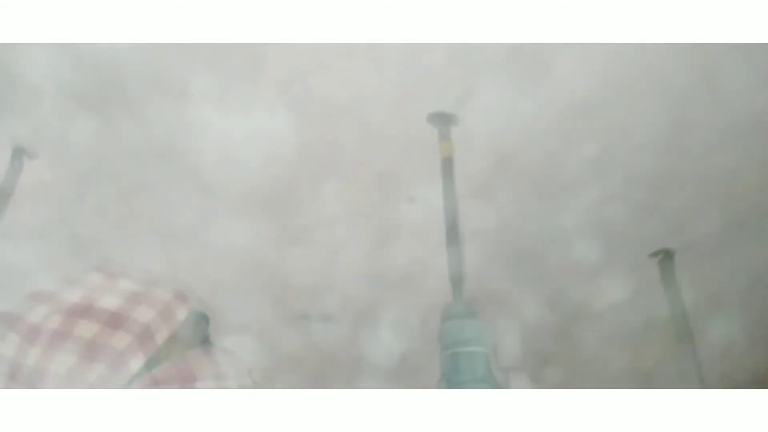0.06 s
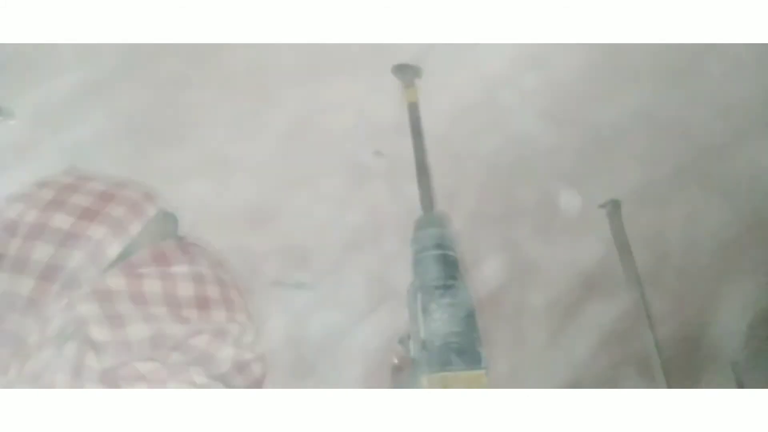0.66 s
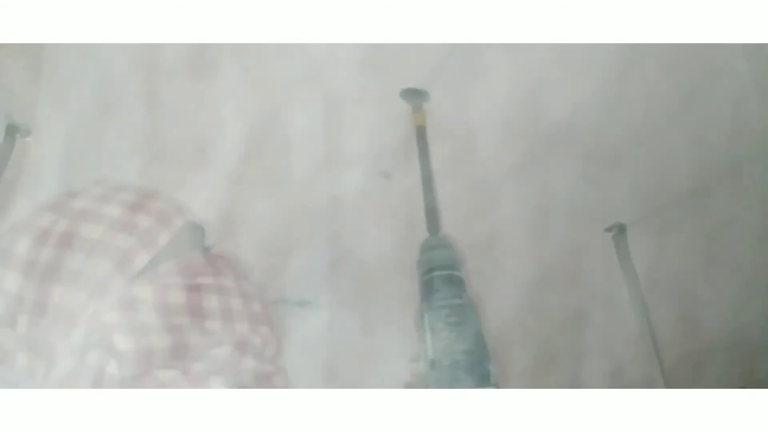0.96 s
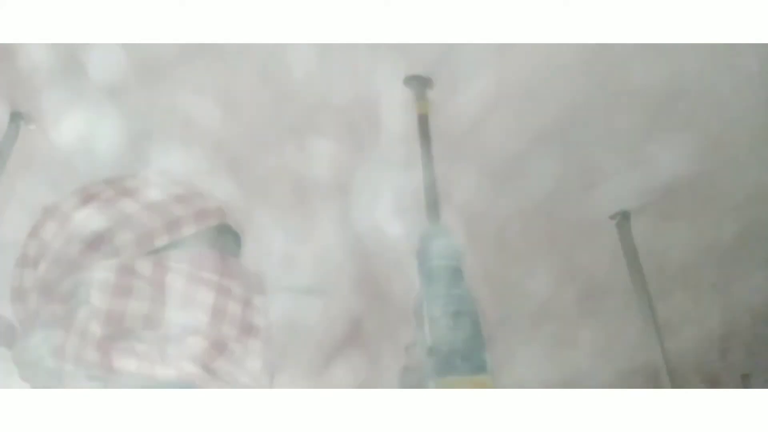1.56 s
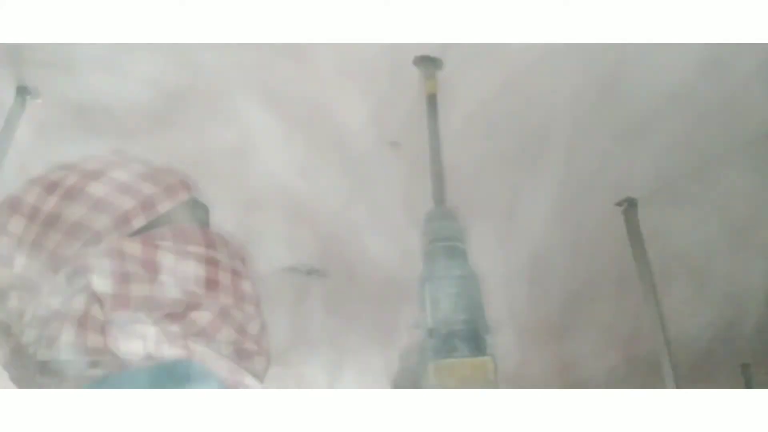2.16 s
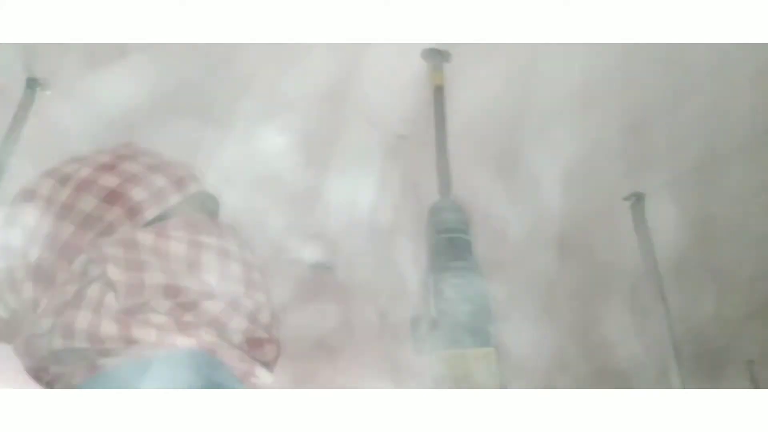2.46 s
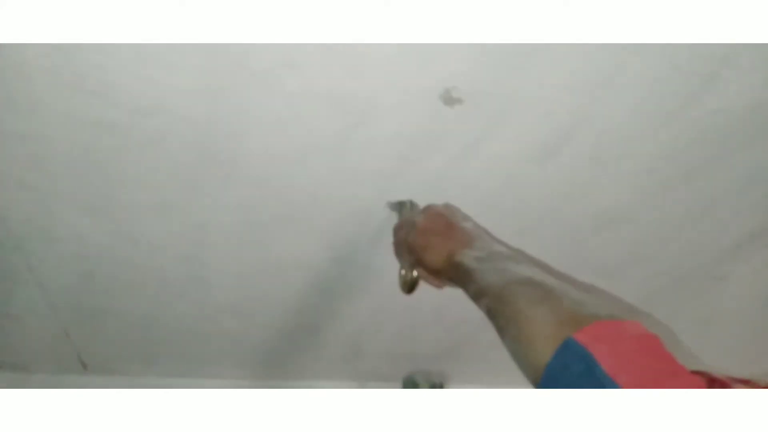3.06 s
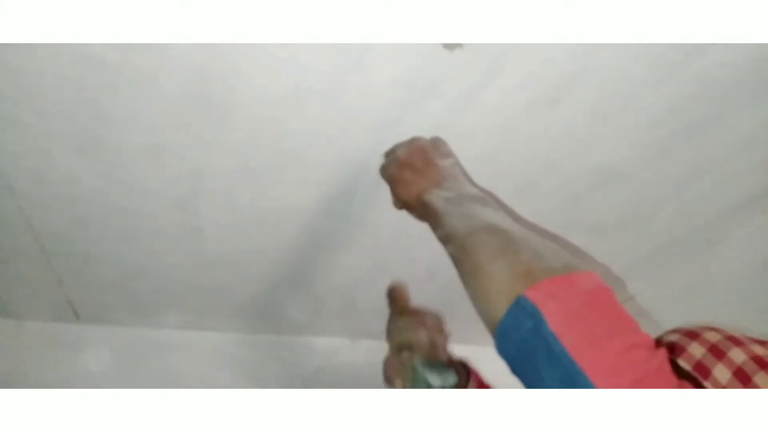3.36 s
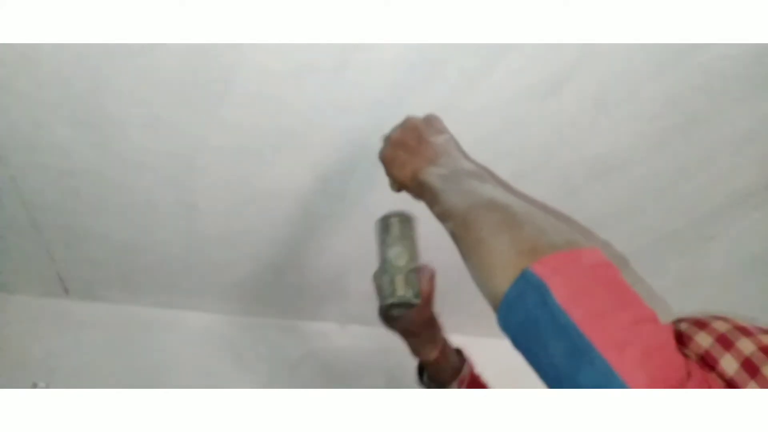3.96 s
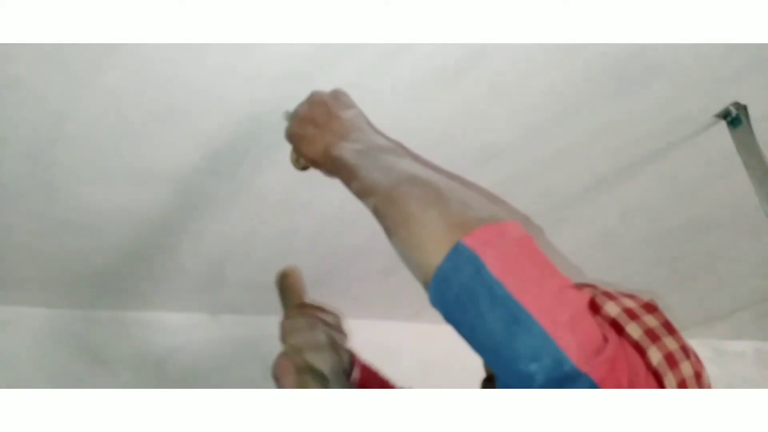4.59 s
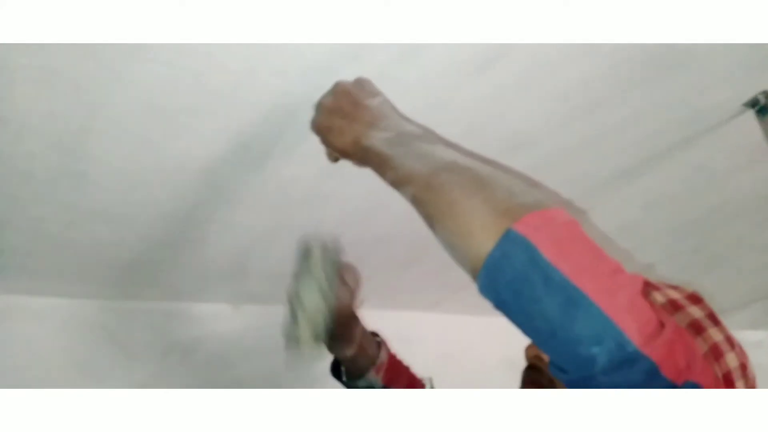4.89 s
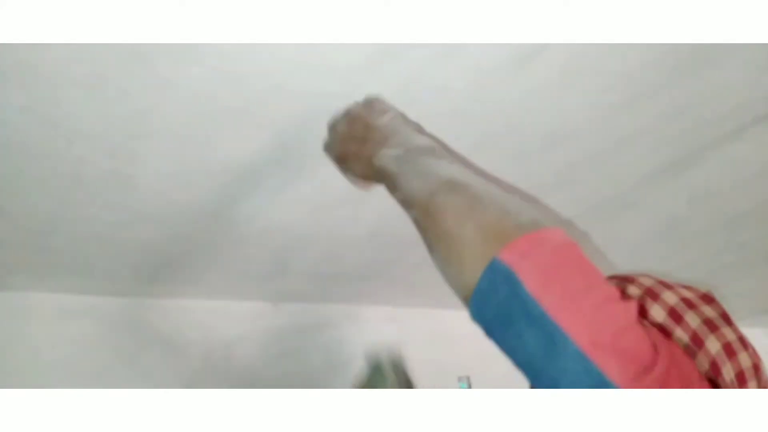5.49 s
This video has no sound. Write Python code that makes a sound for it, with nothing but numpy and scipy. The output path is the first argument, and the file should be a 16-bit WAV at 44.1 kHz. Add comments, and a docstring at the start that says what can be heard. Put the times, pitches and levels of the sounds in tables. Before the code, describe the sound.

A hammer drill bores loudly into a concrete ceiling and cuts off, then five ringing hammer blows boom through a bare room.

```python
"""A hammer drill bores into the concrete ceiling of a bare room, close to a phone's microphone.
Its striker crushes the concrete and rattles body, chuck and bit; its cooling air buffets the microphone.
The sound cuts off. After a short silence, on the echo of an unheard blow, a hammer drives a steel anchor
into the hole: each blow cracks, rings the steel and sets the slab and the room booming."""
import sys
import numpy as np
from scipy import signal
from scipy.fft import rfft, irfft
from scipy.io import wavfile
from scipy.ndimage import uniform_filter1d

SR = 44100
rng = np.random.default_rng(int(sys.argv[2]) if len(sys.argv) > 2 else 0)


def generate_wav(sig):
    """Save sig (samples, or channels by samples) to the path in sys.argv[1] as 16-bit PCM at SR."""
    pcm = np.round(np.clip(np.atleast_2d(sig).T, -1, 1) * 32767).astype(np.int16)
    wavfile.write(sys.argv[1], SR, pcm)


N = 248283
TIME = np.arange(N) / SR
FREQ = np.maximum(np.fft.rfftfreq(N, 1 / SR), 1)
DRILL_END_S, HAMMER_START_S = 2.798, 3.1


def undb(db):
    """Decibels to gain."""
    return 10 ** (np.asarray(db) / 20)


def unit(x):
    """Scale to rms 1."""
    return x / np.sqrt(np.mean(x ** 2))


def pan(db):
    """Left and right gains for a balance, left minus right in dB."""
    return undb(np.array([[db], [-db]]) / 2) / np.sqrt(np.cosh(db * np.log(10) / 20))


def fade(t60):
    """Exponential decay, 60 dB in t60 seconds."""
    return undb(-60 * TIME / t60)


def ramp(s, length):
    """Rise from 0 to 1 over length seconds, centred on s."""
    return np.clip((TIME - s) / length + .5, 0, 1)


def delayed(x, s):
    """Start a sound s seconds later."""
    return np.pad(x, ((0, 0), (int(s * SR), 0)))[:, :N]


def colour(x, gain):
    """Filter by a gain per frequency."""
    return irfft(rfft(x) * gain, N)


def contour(points):
    """Gain per frequency through points of (frequency [Hz], level [dB])."""
    hz, db = np.transpose(points)
    return undb(np.interp(np.log(FREQ), np.log(hz), db))


def walk(rate):
    """Smooth random wander of rms 1, at rate steps a second."""
    hold = int(SR / rate)
    steps = np.repeat(rng.standard_normal(2000), hold)[:N]
    return unit(uniform_filter1d(uniform_filter1d(steps, hold), hold))


def resonate(x, modes):
    """Pass a sound through resonances of (frequency [Hz], width [Hz], level [dB], balance [dB])."""
    power = sum((undb(db) * pan(side)) ** 2 / (1 + ((FREQ - hz ** 2 / FREQ) / width) ** 2) ** 1.36
                for hz, width, db, side in modes)
    return colour(x, np.sqrt(power))


def ring(hz, db, t60, flutter):
    """A decaying mode; its reflections reach the microphone in every phase, so it flutters."""
    swirl = 1 + flutter * (walk(22.3) + 1j * walk(22.4))
    tone = np.imag(swirl * np.exp(2j * np.pi * hz * TIME))
    return undb(db) * fade(t60) * tone / np.sqrt(1 + 2 * flutter ** 2)


def diffuse(alike_hz):
    """White stereo noise of a room: the two sides are alike below alike_hz."""
    mid, side = rng.standard_normal((2, N))
    likeness = .88 / (1 + (FREQ / alike_hz) ** 4)
    return colour(mid, np.sqrt(1 + likeness)) + colour(side, np.sqrt(1 - likeness)) * [[1], [-1]]


def room_hiss():
    """The steady, faint hiss of the bare room."""
    # room tone: (frequency [Hz], level [dB])
    spectrum = [(50, 4), (400, 11), (1000, 3), (2500, 4.5), (5000, -6.5), (6400, -1), (7500, -14),
                (10000, -19), (16000, -41)]
    return undb(-48.5) * unit(colour(diffuse(700), contour(spectrum)))


def echo(noise, bands, early_t60):
    """Dense reflections: in each band a quick early decay over a lingering one."""
    centres = np.log([row[0] for row in bands])
    top_hz = 1.5 * bands[-1][0]
    spectrum = rfft(noise) / np.sqrt(1 + (FREQ / top_hz) ** 8)
    early = fade(early_t60)
    out = 0
    for share, (_, early_db, late_db, t60) in zip(np.eye(len(bands)), bands):
        band = unit(irfft(spectrum * np.interp(np.log(FREQ), centres, share), N))
        out = out + band * np.hypot(undb(early_db) * early, undb(late_db) * fade(t60))
    return out


def walls(x, strength):
    """Near walls return the sound a few milliseconds late and ripple its spectrum."""
    response = np.zeros((2, N))
    response[:, 0] = 1
    for side in response:
        side[rng.integers(60, 900, size=12)] = strength * rng.choice([-1, 1], size=12)
    return unit(colour(x, rfft(response)))


def cooling_air():
    """The drill's cooling air rumbles on the microphone, a little to the right."""
    spectrum = [(2, -6), (12, 2), (35, -3), (70, -11.5), (150, -18.5), (600, -50), (3000, -98.5)]
    return unit(colour(rng.standard_normal((2, N)), contour(spectrum))) * pan(-3)


def microphone_thump():
    """A blow's pressure step overloads the microphone, which swings back slowly."""
    return -undb(6) * np.sin(2 * np.pi * 11 * TIME) * fade(0.15) * pan(-3.5)


def boom():
    """The boom builds as it spreads through slab and room, its loudest band gliding upward."""
    # ceiling slab modes: (frequency [Hz], level [dB], t60 [s])
    slab_modes = [(45.74, -32.5, 3.4), (85.2, -28, 2.6), (120.9, -32, 1.7), (163.8, -22.5, 1.62),
                  (226.5, -21, 1.07), (283.2, -23.5, 1.17), (351, -24, 1.4), (491.6, -23.5, 0.81),
                  (516, -28, 0.7), (696, -32.5, 0.74), (764, -27.5, 0.92)]
    # low echo of slab and room: (frequency [Hz], early level [dB], late level [dB], late t60 [s])
    bands = [(39.4, -24, -30.5, 4.1), (91, -38, -27.5, 3.66), (170, -20, -24.5, 2.14),
             (285, -17.5, -23.5, 1.7), (490, -25, -25, 1.76), (760, -23.5, -33.5, 1.06),
             (1040, -55, -61, 1)]
    from_hz, to_hz, middle_s, width_s = 190, 611.4, .064, 0.047
    slab = sum(ring(*mode, flutter=0.24) for mode in slab_modes)
    hz = to_hz + (from_hz - to_hz) / (1 + (TIME / middle_s) ** 4)
    swell = undb(-17.5) * np.exp(-((TIME - middle_s) / width_s) ** 2)
    glide = swell * np.sin(2 * np.pi * np.cumsum(hz) / SR + 0.76 * walk(86))
    build = 1 - 0.47 / (1 + (TIME / 0.022) ** 4)
    return (echo(diffuse(530), bands, early_t60=0.51) + slab) * build + glide


def concrete_crack():
    """Struck concrete gives a short, bright snap that echoes round the room."""
    # echo of the crack: (frequency [Hz], early level [dB], late level [dB], late t60 [s])
    bands = [(590, -15.5, -27.5, 2.5), (960, -24, -36, 1.88), (1640, -20.5, -37, 1.9),
             (2400, -20.5, -36, 1.51), (3360, -19.5, -31, 1.08), (4930, -19, -30, 0.73),
             (6650, -20.5, -29.5, 0.62), (9900, -21.5, -28.5, 0.56), (11500, -29.5, -50, 0.28),
             (16100, -21.5, -42, .45)]
    snap_spectrum = [(100, -13), (700, -12), (1200, 4), (4500, 6), (9000, -29), (16000, -38)]
    reflections = echo(diffuse(580), bands, early_t60=.3)
    snap = unit(colour(diffuse(2100), contour(snap_spectrum)))
    return reflections + undb(-12) * fade(0.057) * snap


def anchor_ring(hz, force_db):
    """The steel anchor rings, brighter under a harder blow."""
    # anchor modes: (multiple of the pitch, width [Hz], level [dB], balance [dB])
    partials = [(.366, 50, -6.5, -3), (.52, 140, -5, 5), (.88, 50, -1, 3), (.98, 50, 3, 0),
                (1, 740, 0, 9.5), (1.03, 50, 2.5, 3), (1.1, 60, -6, 9), (1.45, 200, -9, 19),
                (1.79, 80, -26, -16)]
    db_per_octave = 3 + 1.5 * force_db
    modes = [(ratio * hz, width, db + db_per_octave * np.log2(ratio), side)
             for ratio, width, db, side in partials]
    decay = undb(-20) * fade(0.46) + undb(-26.5) * fade(0.89)
    return unit(resonate(rng.standard_normal((2, N)), modes)) * decay


def head_ring(levels_db):
    """The hammer head rings in two very high modes, fluttering differently on each side."""
    # head modes: (frequency [Hz], t60 [s])
    modes = [(12384, .55), (15115, .4)]
    return np.array([sum(ring(hz, db, t60, flutter=0.8) for (hz, t60), db in zip(modes, levels_db))
                     for side in range(2)])


def hammer():
    """Each blow cracks the concrete, rings anchor and hammer head and sets off the boom."""
    # blows: (time [s], force [dB], anchor pitch [Hz], anchor gain [dB],
    # lower head mode [dB], upper head mode [dB], thump gain [dB])
    blows = [(2.72, -1.5, 4700, 1, -43, -60, -11.5), (3.4823, -1.5, 4610, 3, -54, -41, -8),
             (3.9146, 0, 4930, 4, -25, -30, -3.5), (4.3443, 0.5, 4690, -1.5, -57, -53, -15),
             (4.7832, 0, 4630, -1.5, -24.5, -29, -11), (5.1980, -5.5, 4370, 1.5, -31, -24, -11)]
    crack, room, thump = concrete_crack(), boom(), microphone_thump()
    out = 0
    for s, force_db, anchor_hz, anchor_db, *head_db, thump_db in blows:
        concrete = undb(0.26 * force_db) * crack + undb(force_db) * room
        steel = undb(anchor_db) * anchor_ring(anchor_hz, force_db) + head_ring(head_db)
        out = out + delayed(concrete + steel + undb(thump_db) * thump, s)
    return out


def striker_rate():
    """Blows per second: the motor gathers speed and wanders with the load."""
    start_hz, working_hz, speed_up_s = 50.03, 61.02, .8
    hz = working_hz + (start_hz - working_hz) * np.exp(-TIME / speed_up_s)
    return hz * (1 + .03 * walk(4))


def impacts(scatter_db, burst_t60, chip_db, room_db):
    """Striker blows crush the concrete in short bursts; chips crackle; the room fills the gaps."""
    cycles = np.cumsum(striker_rate() * (1 + .02 * walk(30))) / SR
    strikes = np.diff(np.floor(cycles), prepend=0) * undb(scatter_db * rng.standard_normal(N))
    bursts = unit(signal.fftconvolve(strikes, fade(burst_t60))[:N])
    chips = (rng.random((2, N)) < 1500 / SR) * rng.standard_normal((2, N))
    crush = bursts * unit(diffuse(2200)) + undb(chip_db) * unit(chips)
    return walls(crush + undb(room_db) * rng.standard_normal((2, N)), strength=0.11)


def judder(hz, depth_db):
    """The level dips briefly and unevenly, many times a second."""
    cycles = np.cumsum(hz * (1 + 0.205 * walk(12))) / SR
    dips = np.sin(np.pi * cycles) ** 8
    return undb(-depth_db * dips * np.clip(1 + 0.68 * walk(8.97), 0, None))


def drill_levels():
    """Levels in dB of body, chuck, scrape, bit and air as the bit sinks in, binds and comes free."""
    # the bit binds in the hole and damps the body:
    # (time [s], length [s], body change [dB], chuck change [dB], scrape change [dB])
    binds = [(.46, .38, -3, 9, -1), (2.01, .95, -6.5, -1, 4)]
    body, chuck, scrape = sum(np.outer(change_db, ramp(s, 0.11) * (1 - ramp(s + length, .22)))
                              for s, length, *change_db in binds)
    # once sunk in, the bit rings more, the tool rattles less and the air reaches the microphone
    shallow = 1 - ramp(.5, 0.082)
    rattle_db = 1.9 * shallow
    return (-15 + body + rattle_db + .5 * walk(12),
            -32 + chuck + rattle_db + 1.2 * walk(12.1),
            -36 + scrape + rattle_db + 1.3 * walk(12),
            -36.5 - 11.5 * shallow + 1.8 * walk(10),
            -26.5 - 11.5 * shallow + 5 * np.tanh(walk(20)))


def drill():
    """The striker sounds through concrete, body, chuck and bit, close enough to saturate the microphone."""
    # crushed concrete: (frequency [Hz], level [dB])
    grind_spectrum = [(40, -2), (150, 0), (400, 1), (800, 0.5), (1100, 0), (1700, 0), (3000, -2),
                      (4700, -5), (6200, -8.5), (8200, -9.5), (9800, -9), (11200, -17), (13500, -20.5),
                      (16000, -26.5)]
    # resonances of body, chuck, flutes scraping the hole, and bit:
    # (frequency [Hz], width [Hz], level [dB], balance [dB])
    body_modes = [(784, 22, -6, 2), (1295, 68, -5, 7.5), (1736, 300, -5, 5.5), (2060, 450, -3, 14.5),
                  (2364, 196, 1, 27.5), (2595, 130, -2, 12.5), (2810, 360, -3.5, 22.5),
                  (3420, 560, -10.5, 14)]
    chuck_modes = [(4390, 500, -2.5, 8), (4810, 470, 0.5, 11), (6250, 230, -20, 7.5)]
    scrape_modes = [(6250, 200, -3.5, 11.5), (7240, 230, 1, 6), (9590, 560, -5.5, -13)]
    bit_modes = [(8570, 45, -1, -11.5), (8520, 40, -6, -21)]
    body_db, chuck_db, scrape_db, bit_db, air_db = drill_levels()
    grind = impacts(scatter_db=3, burst_t60=0.042, chip_db=-10.5, room_db=4)
    rattle = impacts(scatter_db=1.5, burst_t60=0.043, chip_db=-18.5, room_db=5)
    tool = (unit(colour(grind, contour(grind_spectrum))) * undb(-19)
            + unit(resonate(rattle, body_modes)) * undb(body_db)
            + unit(resonate(rattle, chuck_modes)) * undb(chuck_db)
            + unit(resonate(rattle, scrape_modes)) * undb(scrape_db)
            + unit(resonate(rattle, bit_modes)) * undb(bit_db))
    limit = undb(-11.5)
    saturated = limit * np.tanh(tool / limit)
    return saturated * judder(hz=18.5, depth_db=1.5) + cooling_air() * undb(air_db)


def scene():
    """Drilling, an abrupt silence, then hammering that enters on the echo of an earlier blow."""
    drilling = uniform_filter1d(1. * (TIME < DRILL_END_S), size=100)
    hammering = uniform_filter1d(1. * (TIME > HAMMER_START_S), size=400)
    hiss = room_hiss()
    return drill() * drilling + (hammer() + hiss) * hammering


def record(dry):
    """The phone rounds off the highest peaks and cuts the top."""
    rounded = dry / (1 + dry ** 6) ** (1 / 6)
    lowpass = signal.ellip(10, .2, 70, 15850, fs=SR, output="sos")
    return signal.sosfilt(lowpass, rounded)


dry = scene()
out = record(dry)
generate_wav(out)
```